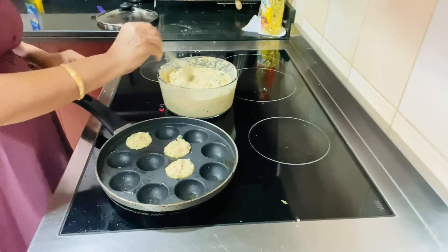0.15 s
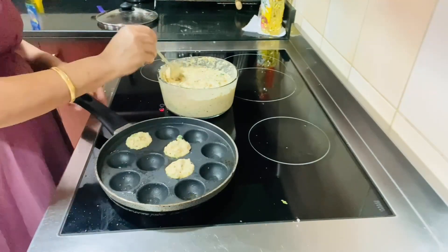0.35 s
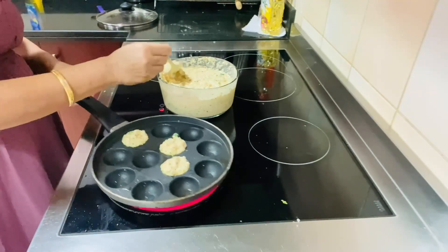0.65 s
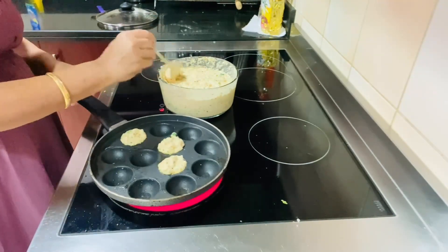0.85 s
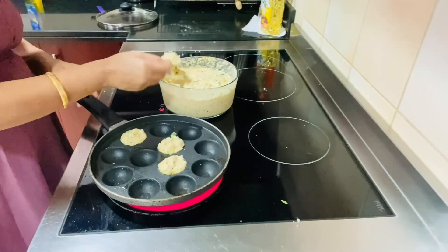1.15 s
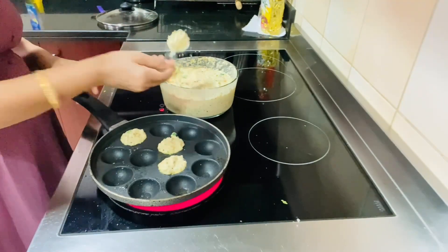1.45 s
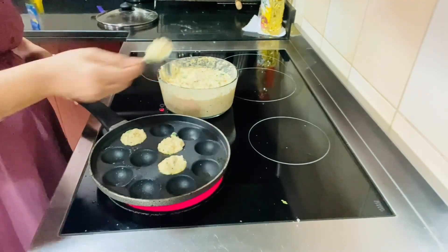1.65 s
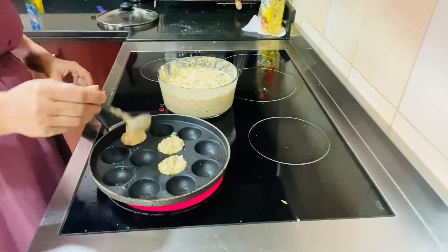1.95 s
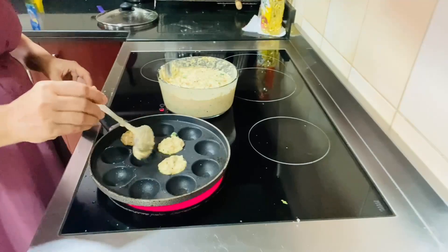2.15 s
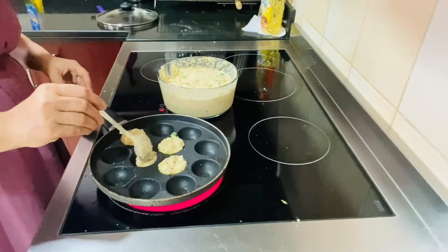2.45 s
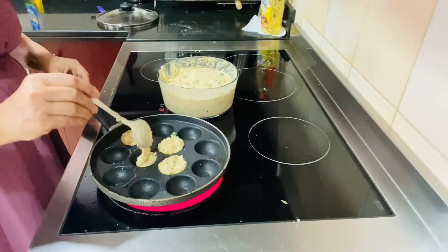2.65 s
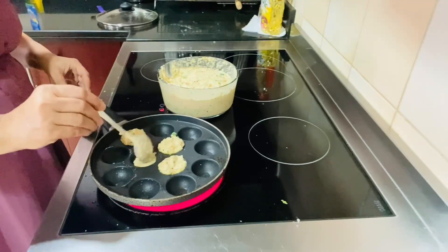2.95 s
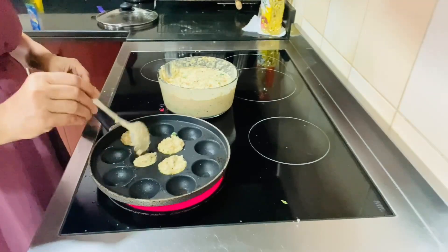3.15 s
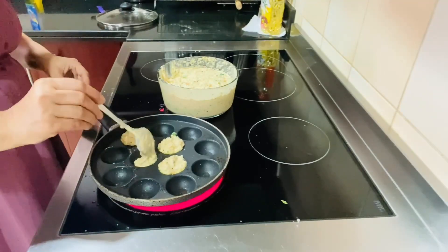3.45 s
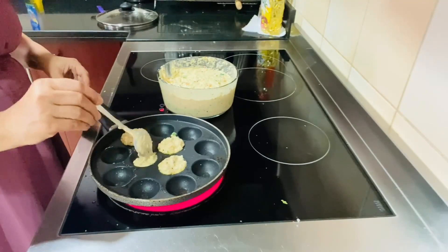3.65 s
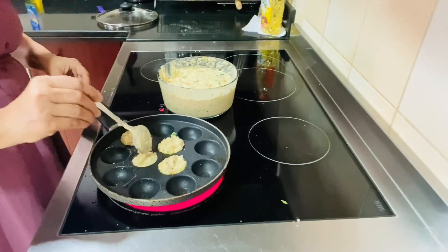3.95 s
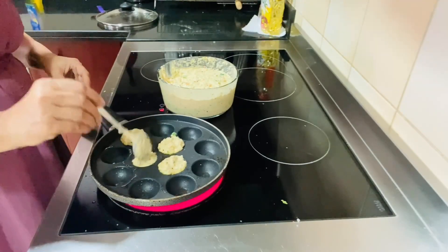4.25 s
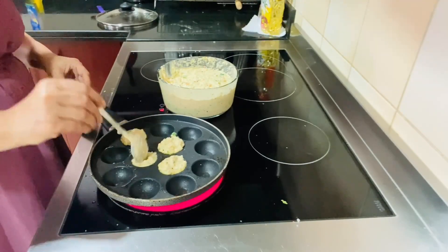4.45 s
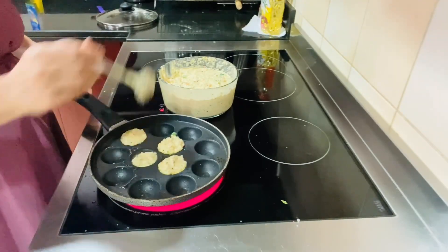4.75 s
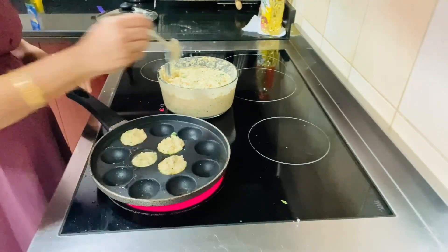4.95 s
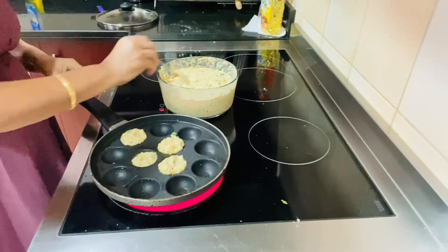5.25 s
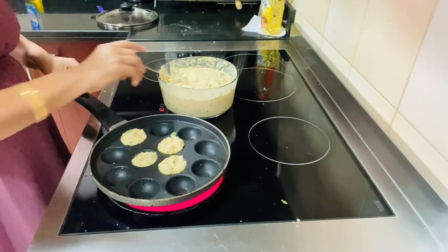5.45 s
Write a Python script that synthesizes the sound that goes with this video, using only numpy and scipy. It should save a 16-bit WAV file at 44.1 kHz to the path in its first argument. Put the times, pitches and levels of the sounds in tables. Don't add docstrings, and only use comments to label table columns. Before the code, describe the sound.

Close stereo pickup in a small tiled kitchen. A thin, bright sizzle with scattered sharp fat spits runs over a steady low extractor hum. Just after two seconds fresh batter lands in the hot pan and the fizz jumps up, crackles on unevenly, then eases. Near the end a spoon gives a single light clink on a glass bowl. No speech.

```python
import sys
import numpy as np
from scipy import signal
from scipy.fft import rfft, irfft, next_fast_len
from scipy.io import wavfile

SR = 44100
rng = np.random.default_rng(int(sys.argv[2]) if len(sys.argv) > 2 else 0)


def transcribe(u):
    v = np.clip(np.atleast_2d(u).T, -1, 1)
    q = np.round(v * 32767).astype(np.int16)
    wavfile.write(sys.argv[1], SR, q)


def ratio(d):
    e = np.asarray(d, float) / 20
    return 10 ** e


N = 247401
PAD = next_fast_len(N + SR // 2)
HZ = np.maximum(np.arange(PAD // 2 + 1) * SR / PAD, 1)


def rms_one(x):
    return x / np.sqrt(np.mean(x ** 2) + 1e-20)


def at_hz(points):
    hz, value = np.array(points).T
    return np.interp(np.log(HZ), np.log(hz), value)


def shaped(x, response):
    return irfft(rfft(x, PAD) * response, PAD)[..., :N]


def band(x, kind, hz, order=2):
    return signal.sosfilt(signal.butter(order, hz, kind, fs=SR, output="sos"), x)


def resonance(x, hz, width_hz):
    r = np.exp(-np.pi * width_hz / SR)
    poles = [1, -2 * r * np.cos(2 * np.pi * hz / SR), r * r]
    return signal.lfilter(np.array([1, 0, -1]) * (1 - r * r) / 2, poles, x)


def drift(rate):
    r = np.exp(-80 * np.pi * rate / SR)
    noise = rng.standard_normal(N // 40 + 2002)
    slow = signal.lfilter([1], [1, -2 * r, r * r], noise)[2000:]
    return np.interp(np.arange(N) / 40, np.arange(len(slow)), rms_one(slow))


def clicks(times, db):
    out = np.full(N, 1e-18)
    np.add.at(out, (np.asarray(times) * SR).astype(int), ratio(db))
    return out


# (time [s], level [dB])
FIZZ_LEVEL = [(0.0, -59), (0.28, -62), (1.76, -62), (2.24, -63.5), (2.29, -53), (2.43, -50), (2.69, -51),
              (3.31, -53.5), (3.53, -55.5), (3.94, -51), (4.25, -57), (4.89, -56), (5.31, -56.5),
              (5.61, -58.5)]
# (frequency [Hz], density [dB per Hz])
FIZZ_SPECTRUM = [(410, -18), (700, -17), (2270, -13), (2630, -13), (9600, -6), (11200, -7.5), (12000, -6.5),
                 (13000, -8), (14800, -0.5), (15900, -1), (16500, -81)]


def fizz(per_s, spread_db, clump_db, near_db):
    level_db = np.interp(np.arange(N) / SR, *np.transpose(FIZZ_LEVEL))
    treble_db = 1.8 + 0.76 * np.minimum(level_db + 48.5, 0)

    born = rng.random(N) < per_s * ratio(clump_db * drift(25)) / SR
    size = ratio(spread_db * np.minimum(rng.exponential(1, N), 3.5))
    grains = born * size * rng.choice([-1, 1], N)
    near = kitchen(rms_one(grains), early_db=-18, late_db=-25, t60=0.13)

    hiss = pair_of_noises()[:, :N] * ratio(0.88 * drift(5.1) + 2.6 * drift(76))
    mix = hiss + ratio(near_db) * near
    mix = pan_body(shaped(mix, ratio(at_hz(FIZZ_SPECTRUM))))
    mix = mix / np.std(band(mix, "band", [2000, 7000]))
    treble = band(mix, "high", 5140)
    return ratio(level_db) * (mix + (ratio(treble_db) - 1) * treble)


# (frequency [Hz], width [Hz], level [dB])
CUPS = [(2477, 67, -5), (3200, 170, -6), (3960, 220, -5.5), (6350, 230, -45), (11100, 1900, -6.5)]


def pan_body(x):
    metal = ratio(3) * resonance(x, 1487, 45)
    cups = sum(ratio(db) * resonance(x, hz, width_hz) for hz, width_hz, db in CUPS)
    return x + metal + cups


# (time [s], dull part [dB], bright part [dB])
SPITS = [(0.0301, -38.5, -37), (0.1229, -39, -41.5), (0.1442, -34, -30), (0.155, -28, -26.5),
         (0.2552, -39, -38.5), (0.414, -33.5, -31), (0.4305, -33, -32), (0.4383, -33, -37),
         (0.4424, -42, -36.5), (0.6255, -39.5, -39), (0.7406, -41.5, -41.5), (0.7715, -38, -46),
         (0.867, -35, -38.5), (0.9432, -31, -30.5), (1.0268, -28.5, -29), (1.1, -39, -44),
         (1.2003, -32, -28.5), (1.354, -32.5, -38), (1.5198, -35, -32.5), (1.5309, -31, -30.5),
         (1.5712, -42, -36), (1.6801, -36, -38.5), (1.7368, -33.5, -29.5), (1.777, -47, -36.5),
         (1.8082, -40, -38), (1.8139, -37, -40), (1.8166, -50, -31.5), (2.031, -39, -38.5),
         (2.0795, -38.5, -37.5), (2.1428, -37, -41.5),
         (2.267, -30, -30), (2.8164, -48, -35.5), (2.8742, -35, -31.5), (3.1256, -28, -37),
               (3.1363, -29.5, -31.5), (3.2333, -34, -30), (3.4301, -28.5, -50), (3.4698, -32, -29),
               (3.4977, -37, -32), (3.5195, -51, -31), (3.6877, -26.5, -27), (3.7513, -42, -28),
               (3.772, -38, -35), (3.8848, -35, -32.5), (3.913, -56, -34), (4.1832, -40, -33.5),
               (4.2738, -40, -35.5), (4.513, -35, -31), (4.675, -56, -39), (4.6934, -52, -32.5),
               (4.799, -38, -32), (4.853, -40, -37.5), (4.9243, -36.5, -42), (4.949, -43, -37),
               (5.0494, -35, -34), (5.1745, -29, -28), (5.2378, -41, -42), (5.2601, -47, -37.5),
               (5.4499, -30.5, -34.5), (5.5152, -43, -29)]


def pops(burst_ms, grit_db, snap_db):
    loud = np.array(SPITS)
    rows = np.vstack([loud, sputter(loud), crackle()])
    rows = rows + [.0002, 11, 10]
    s, dull_db, bright_db = rows.T
    impulses = np.array([clicks(s, dull_db), clicks(s, bright_db)])

    decay = np.exp(-1000 / (burst_ms * SR))
    envelope = signal.lfilter([0, 1], [1, -decay], impulses)
    trail = ratio(grit_db) * rng.standard_normal(N) * envelope
    click, grit = spit_colour(*impulses), spit_colour(*trail)

    low = thumps()
    echoed = kitchen(click + 0.3 * low, early_db=-15, late_db=-27, t60=0.2)
    softening = (1 - ratio(snap_db)) * click
    return echoed + 1.34 * low + grit - softening


def spit_colour(dull, bright):
    return pan_body(band(bright + band(dull - bright, "low", 7000), "high", 2300))


def sputter(spits):
    late, dull, bright = np.moveaxis(rng.random((len(spits), 3, 3)), 2, 0)
    delay = .005 * np.cumsum(.3 + 1.4 * late, axis=1)
    loss_db = 10 + 200 * delay
    s = spits[:, :1] + delay
    dull_db = spits[:, 1:2] - loss_db - 7.1 * dull
    bright_db = spits[:, 2:] - loss_db - 6.1 * bright
    return np.transpose([s.ravel(), dull_db.ravel(), bright_db.ravel()])


def crackle():
    per_s, spread_db = 18, 0.5
    count = int(per_s * N / SR)
    s = rng.uniform(0, (N - 20) / SR, count)
    dull, bright = np.clip(rng.standard_normal((count, 2)), -2, 1.3).T
    swing_db = np.interp(s, *np.transpose(FIZZ_LEVEL)) - np.mean(np.array(FIZZ_LEVEL)[:, 1])
    dull_db = -46.5 + spread_db * dull
    bright_db = -40.5 + spread_db * bright + 0.72 * swing_db
    return np.transpose([s, dull_db, bright_db])


# (time [s], peak level [dB])
BIG_BUBBLES = [
    (1.2001, -30),
    (2.2652, -41),
    (3.6876, -42),
    (5.1737, -38.5),
]


def thumps():
    s, peak_db = np.transpose(BIG_BUBBLES)
    return band(band(clicks(s, peak_db + 20), "low", 1360), "high", 570)


# (time [s], peak level [dB])
SPOON_HITS = [
    (5.3335, -52),
    (5.3352, -44),
    (5.3415, -55),
]
MODE_HZ = [115, 310, 401, 498, 603, 690, 764, 985, 1750, 1800, 2105, 2480, 2705, 2990, 3443, 4010, 4440,
           4495, 4581, 6519, 6630, 8400, 11114]
# (left level [dB], right level [dB], t60 [s], phase lead of the left port [rad])
MODES = [(2, 10, 0.33, 1), (14.5, 10, 0.22, 4), (7, 12, 0.28, 0.7), (-1, 2, 1, 0), (8.5, 8.5, 0.78, 2.1),
         (-4, -4, .15, 2), (13.5, 15.5, 0.38, -1.5), (1, -24, 0.18, -5), (9.5, 19.5, 0.18, -2.5),
         (15.5, 4, 0.27, -3.5), (12, -5, .08, -9.5), (-1, 2, 0.17, -4), (7, 10.5, 0.056, 1),
         (9.5, -10, 0.072, 3), (-4, 9, .1, -5.5), (10.5, 4, 0.083, 4), (11.5, 2, 0.65, 2),
         (7, 10, 0.22, 1.5), (-1, -9, 0.13, -3.5), (9.5, -13, 0.13, 5), (-10, 10, .15, -2),
         (2, -2, .15, 1.6), (8.5, 9.5, .08, -1)]


def spoon(contact_s, free_db, rough_db):
    t, out = np.arange(SR // 2) / SR, np.zeros((2, SR // 2))
    for hz, (left_db, right_db, t60, lead) in zip(MODE_HZ, MODES):
        damped = ratio(-60 * t / contact_s)
        free = ratio(free_db - 60 * t / t60 + rough_db * drift(40)[:len(t)])
        wave = np.sin(2 * np.pi * hz * t + np.array([[lead], [0]]))
        out += (damped + free) * ratio([[left_db], [right_db]]) * wave
    out *= np.clip(t / 0.0013, 0, 1)
    scrape = band(rms_one(pair_of_noises())[:, :len(t)], "band", [400, 7500])
    out += ratio(14.0 - 60 * t / 0.032) * scrape

    s, peak_db = np.transpose(SPOON_HITS)
    struck = shaped(clicks(s, peak_db), rfft(out, PAD))
    return kitchen(struck, early_db=-30, late_db=-37, t60=.35)


# (frequency [Hz], rms level [dB], wander [dB], phase lead of the left port [rad])
MOTOR_TONES = [(47.7, -50, 1.5, 0.32), (99.6, -67.5, -8.5, 1), (128.4, -48, -0.5, 0.05),
               (146.85, -50.5, 3.5, 0.035), (165.4, -53.5, -1.8, 1.07), (250, -74, 7, 2.8),
               (312.4, -62, 2.5, 2.2), (437, -68, 0, 0.11)]
# (frequency [Hz], width [Hz], rms level [dB])
DUCT_MODES = [(53.7, 28, -56), (131, 28, -51), (192.6, 23.6, -50.5)]
# (frequency [Hz], density [dB per Hz])
AIR_SPECTRUM = [(15, -37), (25, -28), (49, -7), (86, -19), (117, 2.5), (142, -33), (252, -10), (378, -13),
                (441, -9), (601, -19.5), (866, -19), (1180, -38), (2500, -29), (3250, -37), (5500, -120)]


def fan():
    t, noise = np.arange(N) / SR, pair_of_noises()[:, :N]
    out = ratio(-54.5) * rms_one(shaped(noise, ratio(at_hz(AIR_SPECTRUM))))
    for hz, width_hz, db in DUCT_MODES:
        out += ratio(db) * rms_one(resonance(pair_of_noises()[:, :N], hz, width_hz))
    for hz, db, wander_db, lead in MOTOR_TONES:
        phase = 2 * np.pi * hz * t + 0.32 * drift(2.86) + rng.uniform(0, 2 * np.pi)
        level = np.sqrt(2) * ratio(db + wander_db * drift(2.85))
        out += level * np.sin(phase + np.array([[lead], [0]]))
    return out


def kitchen(x, early_db, late_db, t60):
    t = np.arange(SR // 2) / SR
    noise = rms_one(pair_of_noises())[:, :len(t)]
    early = noise * ratio(early_db - 60 * t / 0.015) * np.clip(t / 0.00053, 0, 1)
    dulled = band(band(noise, "low", 9200, order=1), "high", 470, order=1)
    late = dulled * ratio(late_db - 60 * t / t60) * np.clip(t / 0.0026, 0, 1)
    return x + shaped(x, rfft(early + late, PAD))


# (frequency [Hz], shared power [0 to 1])
PORT_LIKENESS = [(50, 1), (170, 0.91), (300, 0.62), (600, 0.2), (1100, 0.0071), (2000, 0.29), (3200, 0.33),
                 (5000, 0.04), (7500, 0.15),
                 (8600, .96), (9300, .985), (16000, .985)]


def pair_of_noises():
    alike = np.clip(at_hz(PORT_LIKENESS), 0, 1)
    shared, left, right = rfft(rng.standard_normal((3, PAD)))
    own = np.array([left, right])
    return irfft(np.sqrt(alike) * shared + np.sqrt(1 - alike) * own, PAD)


def port_lag(x):
    lag = np.exp(-2j * np.pi * np.maximum(HZ - 6410, 0) / 5560)
    return shaped(x, np.array([np.ones_like(lag), lag]))


def scene():
    spits = pops(burst_ms=0.73, grit_db=-8, snap_db=-4.5)
    pan = fizz(per_s=2500, spread_db=6.0, clump_db=4, near_db=-2.5) + spits
    return port_lag(pan) + spoon(contact_s=0.043, free_db=-19, rough_db=5.5) + fan()


def low_pass(x):
    return signal.sosfilt(signal.butter(12, 17350, fs=SR, output="sos"), x)


def record(dry):
    cut = band(dry, "high", 30)
    cut = signal.sosfilt(signal.cheby2(10, 15, 15840, fs=SR, output="sos"), cut)
    cut = signal.sosfilt(signal.cheby2(12, 45, 16800, fs=SR, output="sos"), cut)
    return low_pass(cut)


dry = scene()
out = record(dry)
transcribe(out)
```